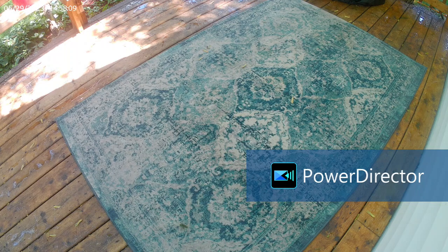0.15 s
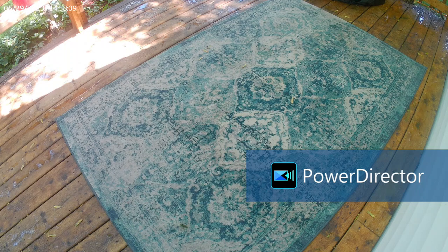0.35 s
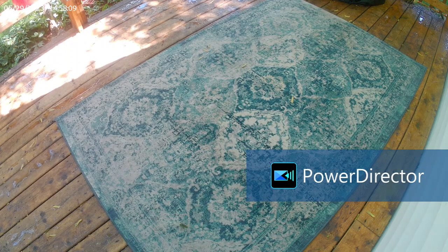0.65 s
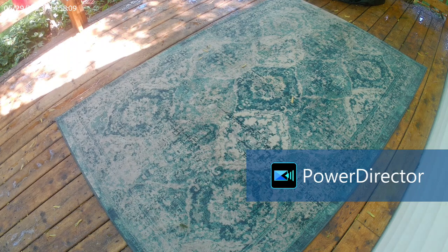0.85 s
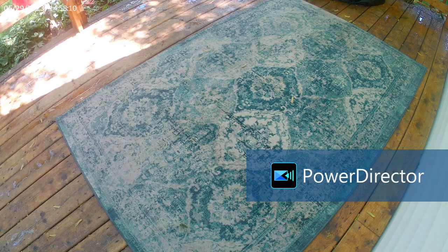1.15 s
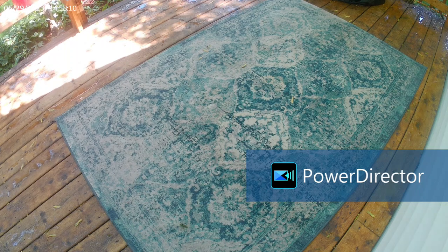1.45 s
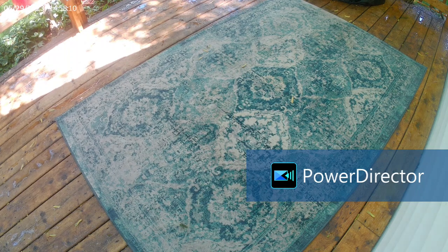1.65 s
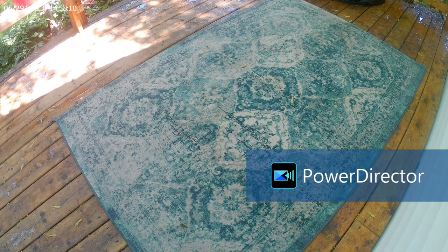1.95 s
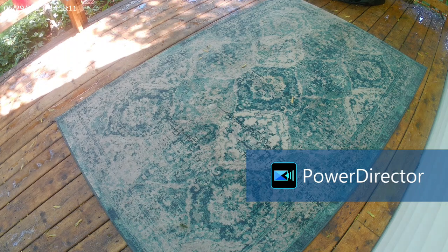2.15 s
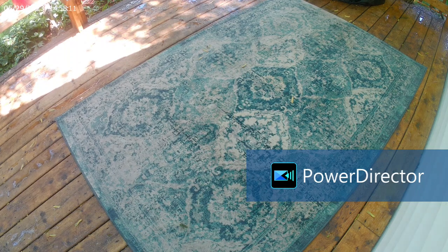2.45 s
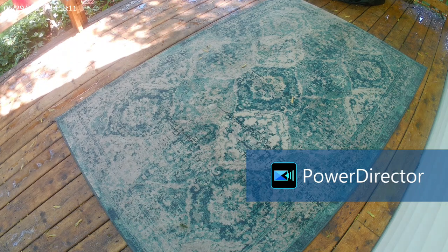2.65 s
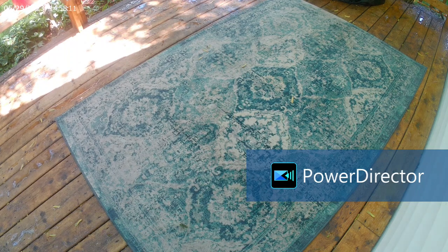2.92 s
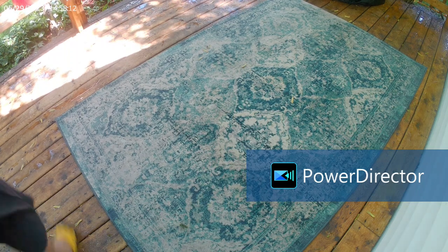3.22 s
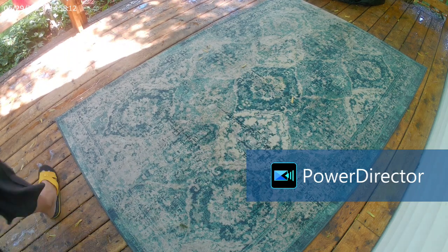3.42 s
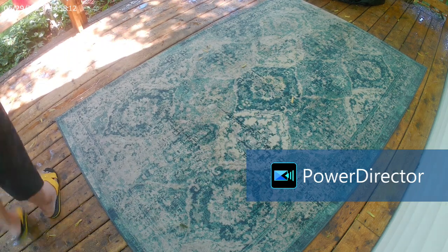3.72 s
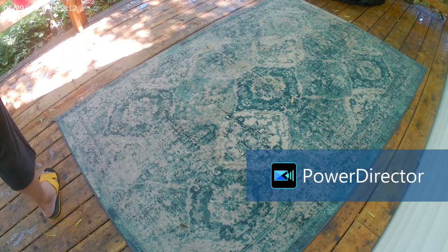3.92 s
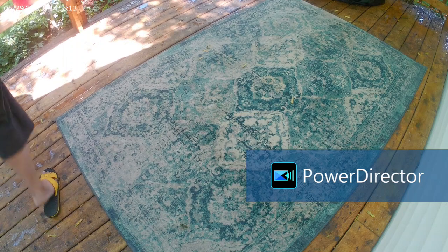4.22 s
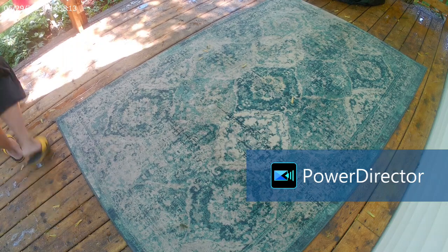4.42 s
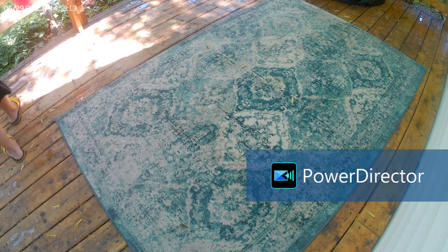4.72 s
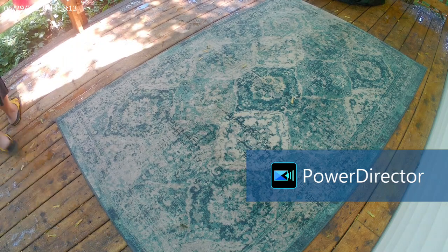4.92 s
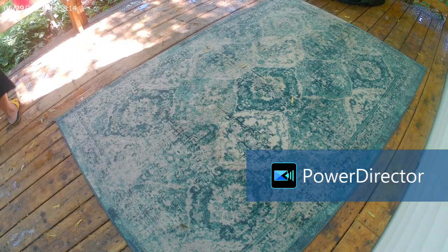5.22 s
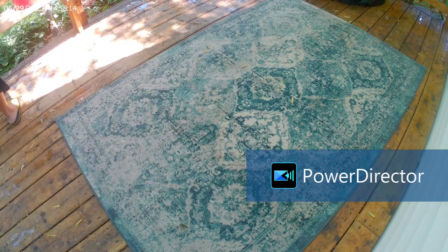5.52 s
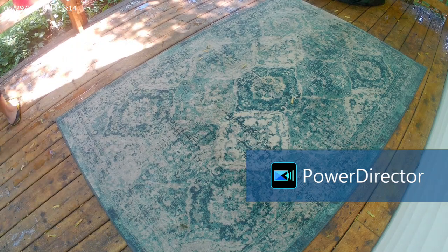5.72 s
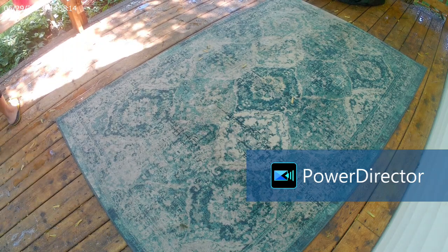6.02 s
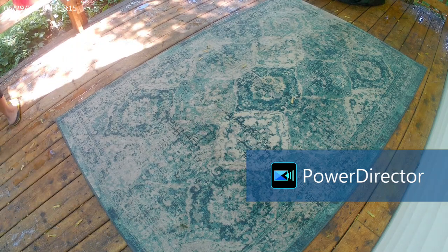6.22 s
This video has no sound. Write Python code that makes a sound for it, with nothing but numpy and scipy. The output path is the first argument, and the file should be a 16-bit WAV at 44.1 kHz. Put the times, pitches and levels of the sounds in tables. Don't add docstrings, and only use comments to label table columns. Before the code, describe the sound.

Flip-flops slap, scuff and knock irregularly across a wooden outdoor deck, one step landing very hard, over low rumble, soft hiss and timber shaking.

```python
import sys
import numpy as np
from scipy import signal
from scipy.fft import rfft, irfft
from scipy.io import wavfile
from scipy.ndimage import uniform_filter1d

SR = 44100
rng = np.random.default_rng(int(sys.argv[2]) if len(sys.argv) > 2 else 0)


def transcribe(u):
    v = np.clip(np.atleast_2d(u).T, -1, 1)
    q = np.round(v * 32767).astype(np.int16)
    wavfile.write(sys.argv[1], SR, q)


def amplitude_ratio(level_db):
    exponent = np.asarray(level_db, float) / 20
    return 10 ** exponent


N = 280652

# f/Hz, density/dB per Hz
FLOOR_SPECTRUM = [(5.9, -28), (10, 1), (32, -3), (56, 3), (79, -19.5), (171, -38), (280, -29.5),
                  (2280, -44), (14500, -50), (15900, -51)]
FLOOR_DB = -39
# f/Hz, width/Hz, level/dB
MACHINE_DRONES = [(47.26, 5.1, -43.5), (69, 9.3, -45), (132, 7.4, -59)]
# t/s, level/dB
RUSTLE_LEVEL = [(0.0, -52.5), (0.81, -53), (1.61, -49.5), (1.75, -52), (2.82, -51.5), (3.13, -55),
                (3.49, -49.5), (3.77, -56), (4.14, -52), (4.48, -55.5), (4.75, -51.5), (4.9, -53),
                (5.17, -54.5), (5.47, -53), (5.85, -54.5), (6.36, -54)]
# f/Hz, density/dB per Hz
RUSTLE_SPECTRUM = [(130, -12), (220, 4), (400, 6.5), (1000, -1.5), (3000, -10.5), (5000, -16.5),
                   (9000, -25.5)]
# peak level/dB, start f/Hz, end f/Hz, length/ms
CHIRP = (-52.5, 5749, 7900, 6.5)
CHIRP_S = 0.109
# f/Hz, t60/s
YARD_T60 = [(200, 0.19), (1000, 0.1), (4000, 0.098), (10000, 0.16)]
# f/Hz, level/dB
MIC_PORT = [(20, 12.5), (10300, -9.5), (11300, -18), (12500, -17), (16000, -33)]

# low f/Hz, high f/Hz
TIMBER_BANDS = [(12, 45), (45, 105), (105, 235)]
REST_DB = (-37, -44, -54.5)
# t/s of strongest shake, level/dB, length/s
BEAM_SHAKES = [(0.443, -27, 0.1), (0.74, -44, 0.04), (0.877, -28.5, 0.047), (1.2, -28.5, 0.13),
               (1.748, -24.5, 0.095), (2.21, -35.5, 0.081), (2.947, -33, 0.057), (3.426, -29, 0.047),
               (4.305, -38, 0.075), (4.756, -33.5, 0.093), (5.413, -27, 0.11), (5.602, -28.5, 0.058),
               (5.974, -26.5, 0.03), (6.144, -31, 0.029)]
# t/s of strongest shake, level/dB, length/s
JOIST_SHAKES = [(0.348, -43.5, 0.17), (0.715, -39, .05), (0.923, -44, 0.046), (1.163, -40, 0.11),
                (1.524, -28, 0.04), (1.793, -36, 0.031), (1.94, -35.5, .1), (2.74, -38, 0.054),
                (2.957, -37.5, 0.18), (4.213, -42, 0.1), (4.83, -38.5, 0.087), (5.425, -30, 0.22),
                (5.952, -39, 0.047), (6.162, -44, 0.038)]
# t/s of strongest shake, level/dB, length/s
PLANK_SHAKES = [(0.267, -47, 0.065), (1.11, -48, .1), (1.67, -55, 0.057), (1.921, -44, 0.068),
                (2.707, -41, 0.078), (2.93, -39, 0.051), (3.5, -55.5, 0.16), (4.258, -51, 0.037),
                (4.8, -51.5, 0.075), (5.412, -37.5, 0.11)]
RISE_SHARE = 0.4
# t/s, peak level/dB, f/Hz, t60/s, direction (down -1, up 1)
DECK_SWAYS = [
    (1.111, -13, 26, 0.23, -1),
    (1.503, -1, 30.6, 0.13, -1),
    (1.51, -9.5, 13.6, 0.58, 1),
    (3.385, -19, 35.2, 0.31, 1),
    (5.385, -17.5, 31, 0.33, 1),
]

# t/s, peak level/dB, f/Hz, t60/s
LOW_NOTES = [(0.272, -24, 117, 0.075), (1.087, -25, 166, 0.053), (1.501, -23, 135, 0.14),
             (1.913, -21.5, 181, 0.16), (2.522, -28.5, 201, 0.067), (2.721, -25.5, 116, 0.084),
             (2.949, -34, 193, 0.14), (3.597, -50, 236, 0.1), (5.392, -21.5, 150, 0.07),
             (5.381, -13.5, 121, 0.085), (5.452, -38, 100, 0.1), (5.489, -29, 100, 0.092)]
# t/s, peak level/dB, f/Hz, t60/s
MID_NOTES = [(0.588, -50, 280, 0.06), (1.083, -36, 332, 0.039), (1.475, -37, 584, 0.085),
             (1.912, -46, 264, 0.061), (1.937, -36.5, 340, 0.046), (2.522, -35, 370, 0.054),
             (2.644, -52, 431, 0.049), (2.722, -31, 388, 0.094), (2.863, -31, 370, 0.06),
             (2.888, -35, 382, 0.066), (3.266, -38, 366, 0.11), (3.599, -38, 283, 0.028),
             (3.763, -45, 460, 0.036), (4.118, -28, 460, 0.088), (4.734, -30, 630, 0.027),
             (5.142, -38, 300, 0.038), (5.374, -28, 327, 0.064), (5.453, -38, 264, 0.053),
             (5.778, -27.5, 523, 0.051)]
# t/s, peak level/dB, f/Hz, t60/s
HIGH_NOTES = [(1.936, -32, 1720, 0.034), (1.918, -39, 1150, 0.04), (2.4194, -39, 2440, 0.04),
              (2.9432, -42, 1840, 0.046), (3.5254, -43, 1700, 0.04), (3.6033, -33.5, 2280, 0.025),
              (4.2481, -37.5, 1850, 0.04), (4.8322, -41, 1620, 0.03), (5.3716, -35, 1350, 0.044),
              (5.778, -43, 1200, 0.055)]
# t/s, peak level/dB, f/Hz, t60/s
MORE_NOTES = [(1.476, -33, 720, 0.046), (1.505, -33, 1330, 0.018), (2.419, -47, 4240, 0.022),
              (2.699, -41, 476, .04), (2.916, -29, 560, 0.035), (2.917, -32, 994, 0.031),
              (2.917, -31, 4020, .015), (2.918, -32, 4970, 0.014), (2.956, -37, 2800, 0.025),
              (3.604, -33, 3120, 0.025), (3.605, -44, 3700, .02), (4.116, -36, 880, 0.045),
              (4.83, -42, 3960, .02), (5.226, -42, 800, 0.04), (5.372, -30, 660, 0.09),
              (5.631, -44, 2640, .025), (5.778, -42, 2620, 0.033), (1.508, -23, 300, 0.053),
              (5.376, -24, 229, 0.073), (5.378, -32, 399, .14), (5.441, -19.5, 92, 0.27)]
# f/Hz, level/dB, t60/s
BOARD_MODES = [(332, -26, 0.11), (462, -2.5, 0.033), (718, -4.5, 0.054), (1190, -4, 0.029),
               (1400, -6.5, 0.02), (1700, -7, 0.021), (2000, -6.5, 0.019), (2450, -31, .025)]
# t/s, level/dB, contact/ms
FLAT_BLOWS = [
    (1.1195, -31.5, 0.79),
    (1.1225, -23, 1.5),
    (1.5026, -24, 1.95),
    (1.504, -32, 0.77),
    (1.5061, -20.5, 0.59),
    (1.512, -20.5, 1.0),
]

# f/Hz, level/dB
AIR_PUFF = [(2500, -52), (5000, -31), (7500, -5.5), (10000, -2.5), (16000, -16)]
# t/s, peak level/dB, colour f/Hz, spread/octaves
TICKS = [(1.1203, -23, 2570, 1.1), (1.1234, -23.5, 1800, 1.02), (1.494, -31, 554, 0.57),
         (1.4985, -45, 2200, 0.77), (1.5017, -24, 2100, 0.69), (1.5034, -19, 2160, 1),
         (1.5057, -23, 1900, 0.93), (1.5064, -17, 1340, 0.32), (1.5136, -30, 1390, 0.57),
         (1.5170, -33, 740, 0.88), (1.9186, -34.5, 3180, 0.63), (1.9194, -34, 1200, .35),
         (1.9374, -34, 1840, 0.59), (1.9425, -40, 1200, 0.39), (2.4206, -32.5, 1890, 0.97),
         (2.4208, -46, 4300, 0.16), (2.8676, -41, 1500, 1.2), (2.8930, -39, 1100, 0.63),
         (2.8949, -35, 3000, 1), (2.9167, -23.5, 3560, 0.67), (2.9168, -38, 910, 0.68),
         (2.9203, -29, 2500, 0.63), (2.9221, -34, 800, 0.61), (2.9324, -38, 1600, 0.77),
         (2.9373, -39, 3200, 0.55), (2.9434, -38, 1000, .6), (2.9463, -36, 2000, 0.43),
         (2.9536, -44, 2800, .4), (2.9583, -35, 2800, .25), (3.5267, -39, 1100, .5),
         (3.5282, -40, 1900, 0.62), (3.6047, -36.5, 2980, 0.46), (4.1218, -38, 800, 0.45),
         (4.1301, -37, 646, 0.55), (4.2495, -32.5, 2600, 0.83), (4.7216, -44, 3500, 0.83),
         (4.7371, -38.5, 790, 0.97), (4.7437, -36, 990, 0.83), (4.7539, -41, 800, 0.57),
         (4.7628, -42, 800, 0.54), (4.8310, -44, 3800, 0.38), (4.8346, -37.5, 1700, 0.45),
         (4.8461, -46, 800, .5), (5.3740, -33.5, 890, 1.05), (5.3837, -35, 655, 0.51),
         (5.3964, -39, 600, 0.65), (5.4546, -35, 800, 0.62), (5.7793, -37.5, 594, 0.87),
         (5.7794, -43, 2400, 0.64), (5.8001, -39, 550, .4)]
# t/s, peak level/dB, length/ms, colour f/Hz, spread/octaves
SCUFFS = [(0.012, -52, 51, 3100, 0.4), (0.54, -50, 28, 1600, 0.69), (1.40, -53, 80, 2500, 0.33),
          (1.507, -41, 18, 1490, 0.48), (1.599, -48, 130, 2200, .9), (1.938, -43, 17, 1100, 0.55),
          (2.06, -50, 56, 3500, .7), (2.29, -48, 55, 2600, 1.14), (2.361, -46, 43, 2500, 0.94),
          (2.425, -44, 23, 1870, 0.45), (2.80, -48, 49, 2800, 1.1), (2.925, -41, 53, 1500, 1.2),
          (3.42, -46, 23, 3280, 0.22), (3.485, -45.5, 42, 3000, 0.67), (3.52, -40, 22, 1900, 0.73),
          (3.602, -45, 18, 2900, .35), (4.04, -55, 46, 3000, 0.38), (4.228, -38, 32, 2570, 0.71),
          (4.889, -46.5, 58, 2100, 0.91)]
# t/s, peak level/dB, length/ms, colour f/Hz, spread/octaves
SWISHES = [(1.1172, -32, 9.8, 2600, 1.1), (1.125, -35, 21, 1700, 0.83), (1.499, -26.5, 9.5, 1800, 2),
           (2.645, -43.5, 85, 8000, 0.6), (2.87, -44, 63, 2200, 1.5), (2.919, -43.5, 100, 2310, 0.95),
           (3.31, -45, 27, 3220, 0.45), (4.29, -54, 36, 9500, .2), (4.58, -50, 37, 2200, 1.2),
           (4.725, -47, 30, 3000, 1.2), (4.822, -38.5, 28, 3600, 0.75), (4.838, -44.5, 33, 3600, 1.1),
           (5.14, -51, 60, 9000, 0.6)]
# t/s, peak level/dB, length/ms, colour f/Hz, spread/octaves
GRINDS = [(.585, -45.5, 37, 720, 0.61), (2.635, -45.5, 76, 2930, 0.25), (2.63, -39.5, 70, 560, 0.59),
          (2.7, -44.5, 30, 244, 0.52), (2.705, -44, 54, 380, 0.22), (4.11, -38.5, 33, 600, 0.64),
          (5.375, -39, 100, 500, 0.94), (5.4, -37.5, 110, 332, 0.6), (5.471, -42.5, 102, 814, 0.74)]
# t/s, peak level/dB, contact/ms, colour/octaves above 1 kHz, spread/octaves
KNOCKS = [(0.591, -47, 20, -2.3, 1), (1.084, -30, 4.6, -1.3, 0.51), (1.477, -43, 9.8, 0.43, 0.68),
          (1.502, -21.5, 7.5, -0.56, 0.95), (1.915, -30.5, 17, -0.082, 0.73),
          (2.522, -33, 7.8, -2.16, 0.62), (2.863, -33, 9.6, -1.17, 1.14), (2.945, -32.5, 8.9, -1.8, 0.9),
          (3.265, -53, 9.8, -2.5, .72), (3.6, -32, 5.5, -1.8, 1.12), (3.764, -43, 8, -1.06, 0.58),
          (4.111, -33.5, 16, -0.83, 0.81), (4.735, -33, 8.8, -0.85, 0.83), (5.139, -42, 7.3, -1.9, 0.83),
          (5.224, -52, 6.1, 0.5, 0.76), (5.372, -28.5, 15, -1, 0.96), (5.450, -38, 12, -1.4, 0.98),
          (5.776, -36.5, 14, -1.28, 0.75)]
# t/s, peak level/dB, contact/ms, colour/octaves above 1 kHz, air puff level/dB
SLAPS = [(0.5497, -45.5, 3, 1.7, -14), (1.118, -26, 5.8, 1.24, -14), (1.501, -25.5, 2.7, 0.61, -5),
         (1.517, -33, 2.4, 1.3, -12), (1.916, -40, 4.9, 1, -40), (1.935, -32, 4.5, 0.54, -24),
         (2.349, -43, 5, 1.5, -16), (2.4202, -31, 1.9, 0.34, -31), (2.5716, -50, 4, 1.4, -14),
         (2.865, -38, 4, 1.05, -9), (2.8918, -37, 4, 0.52, -8), (2.9162, -31.5, 2.2, 1.95, -32),
         (3.3368, -41.5, 4.2, 1.2, -19), (3.397, -42.5, 3.9, 1.3, -14), (3.418, -42.5, 5.9, 1.2, -14),
         (3.526, -41, 4, 1.2, -10), (3.6031, -38.5, 3.2, 1.2, -4), (4.2479, -38, 4, 1.1, -26),
         (4.5667, -44, 6.6, 0.76, 2), (4.718, -44.5, 6.2, 1.5, 6), (5.63, -37, 4, 0.66, -5),
         (5.778, -40, 3.8, 0.74, -7)]
SLAP_SPREAD = 1.11
SCUFF_PUFF_DB, SWISH_PUFF_DB, GRIND_PUFF_DB, KNOCK_PUFF_DB = -17, -6, -31, -38


def evened(x):
    return x / np.sqrt(np.mean(abs(x) ** 2) + 1e-20)


def read(points, hz):
    f, value = np.transpose(points)
    return np.interp(np.log(hz + 1), np.log(f + 1), value)


def add(mix, s, sound):
    part = mix[round(s * SR):][:len(sound)]
    part += sound[:len(part)]


def coloured(gain):
    spectrum = rfft(rng.standard_normal(N))
    return evened(irfft(spectrum * gain(np.fft.rfftfreq(N, 1 / SR)), N))


def causal(gain):
    full = np.log(np.concatenate([gain, gain[-2:0:-1]]) + 1e-5)
    return np.exp(np.conj(signal.hilbert(full)))[:len(gain)]


def echoes(x, t60_of, size=16384):
    taps = np.zeros(size)
    at = np.arange(220, size - 22, 22)
    at = at + rng.integers(0, 22, len(at))
    taps[at] = rng.choice([-1., 1.], len(at))
    hz, t, z = signal.stft(taps, SR, nperseg=256)
    decay = amplitude_ratio(-60 * t / t60_of(hz)[:, None])
    tail = signal.istft(z * decay, SR, nperseg=256)[1]
    return signal.fftconvolve(x, tail / np.linalg.norm(tail))[:N]


def background():
    floor = amplitude_ratio(FLOOR_DB) * coloured(lambda hz: amplitude_ratio(read(FLOOR_SPECTRUM, hz)))
    drones = np.zeros(N)
    for f, width, db in MACHINE_DRONES:
        drones += amplitude_ratio(db) * coloured(lambda hz: 1 / (1 + (2 * (hz - f) / width) ** 2))
    flicker_db = 1.8 * coloured(lambda hz: 1 / (1 + (hz / 25) ** 2))
    level_db = np.interp(np.arange(N) / SR, *np.transpose(RUSTLE_LEVEL)) - 4
    rustle = amplitude_ratio(level_db + flicker_db) * coloured(lambda hz: amplitude_ratio(read(RUSTLE_SPECTRUM, hz)))
    return floor + drones + rustle


def bird():
    db, start_hz, end_hz, ms = CHIRP
    out, count = np.zeros(N), round(ms * SR / 1000)
    turns = np.cumsum(np.linspace(start_hz, end_hz, count)) / SR
    whistle = np.sin(2 * np.pi * turns) * signal.windows.tukey(count, 0.25)
    add(out, CHIRP_S, amplitude_ratio(db) * whistle)
    return out + amplitude_ratio(1.0) * echoes(out, lambda hz: 0.25 + 0 * hz)


def shaking(rest_db, shakes):
    t = np.arange(N) / SR
    power = amplitude_ratio(rest_db) ** 2
    for s, db, length in shakes:
        reach = length * np.where(t < s, RISE_SHARE, 1)
        power = power + amplitude_ratio(db) ** 2 * np.exp(-2 * ((t - s) / reach) ** 2)
    return np.sqrt(power)


def tremble():
    out = np.zeros(N)
    timbers = (BEAM_SHAKES, JOIST_SHAKES, PLANK_SHAKES)
    for rest_db, shakes, (lo, hi) in zip(REST_DB, timbers, TIMBER_BANDS):
        rumble = coloured(lambda hz: 1 / np.sqrt((1 + (lo / (hz + 1)) ** 8) * (1 + (hz / hi) ** 8)))
        out += shaking(rest_db, shakes) * rumble
    return out


def sways():
    out, t = np.zeros(N), np.arange(SR // 2) / SR
    onset = 1 - np.exp(-t / 0.012)
    for s, db, hz, t60, way in DECK_SWAYS:
        swing = amplitude_ratio(db - 60 * t / t60) * np.sin(2 * np.pi * hz * t)
        add(out, s, np.sign(way) * swing * onset)
    return out


def ring(hz, t60, rise_cycles, detune):
    t = np.arange(SR // 4) / SR
    pair = np.sin(2 * np.pi * hz * t) + 0.53 * np.sin(2 * np.pi * hz * detune * t)
    return pair * amplitude_ratio(-60 * t / t60) * (1 - np.exp(-t * hz / rise_cycles))


def planks():
    out, notes = np.zeros(N), LOW_NOTES + MID_NOTES + HIGH_NOTES + MORE_NOTES
    sides = np.sign(rng.standard_normal(len(notes)))
    for (s, db, hz, t60), side in zip(notes, sides):
        note = ring(hz, t60, rise_cycles=0.44, detune=1 + 0.078 * side)
        add(out, s, amplitude_ratio(db - 5) * note / abs(note).max())
    boards = sum(amplitude_ratio(db) * ring(hz, t60, rise_cycles=0.33, detune=1.042) for hz, db, t60 in BOARD_MODES)
    for s, db, ms in FLAT_BLOWS:
        push = np.hanning(max(round(ms * SR / 2000), 3))
        add(out, s, amplitude_ratio(db) * np.convolve(boards, push / push.sum()))
    return out


def ticks(size=2048):
    out, hz = np.zeros(N), np.fft.rfftfreq(size, 1 / SR)
    for s, db, colour_hz, spread in TICKS:
        sole = np.exp(-0.5 * (np.log2(hz / colour_hz + 1e-3) / max(spread, 0.1)) ** 2)
        sound = irfft(causal(sole * amplitude_ratio(read(MIC_PORT, hz))))[:size // 2]
        add(out, s - abs(sound).argmax() / SR, amplitude_ratio(db) * sound / abs(sound).max())
    return out


def struck(t, length):
    return (1 - np.exp(-t / (0.14 * length))) * np.exp(-(t / length) ** 1.15)


def dragged(t, length):
    return np.sin(np.pi * np.minimum(t / length, 1) ** 0.7) ** 0.9


def contacts(table, shape, grain_db, size):
    out, t, hz = np.zeros(N), np.arange(size) / SR, np.fft.rfftfreq(size, 1 / SR)
    port = amplitude_ratio(read(MIC_PORT, hz))
    for s, db, ms, colour, spread, puff_db in table:
        noise, grit = rng.standard_normal((2, size))
        grit = amplitude_ratio(grain_db * evened(uniform_filter1d(grit, size=40)))
        force = rfft(noise * grit * shape(t, max(ms, 0.5) / 1000))
        force /= np.sqrt(uniform_filter1d(abs(force) ** 2, size=size // 64))
        sole = np.exp(-0.5 * ((np.log2(hz / 1000 + 1e-3) - colour) / max(spread, 0.2)) ** 2)
        air = amplitude_ratio(puff_db + read(AIR_PUFF, hz))
        sound = irfft(force * causal((sole + air) * port))
        add(out, s, amplitude_ratio(db) * sound[:size // 2] / abs(sound).max())
    return out


def drags(table, puff_db):
    rows = [(s, db, ms, np.log2(hz / 1000), spread, puff_db) for s, db, ms, hz, spread in table]
    return contacts(rows, dragged, grain_db=3.5, size=16384)


def knocks():
    rows = [(*row, KNOCK_PUFF_DB) for row in KNOCKS]
    return contacts(rows, struck, grain_db=3.5, size=8192)


def slaps():
    rows = [(s, db, ms, colour, SLAP_SPREAD, puff_db) for s, db, ms, colour, puff_db in SLAPS]
    return contacts(rows, struck, grain_db=1.0, size=8192)


def scene():
    far = background() + bird() + tremble() + sways()
    steps = planks() + ticks() + knocks() + slaps()
    steps += drags(SCUFFS, SCUFF_PUFF_DB) + drags(SWISHES, SWISH_PUFF_DB) + drags(GRINDS, GRIND_PUFF_DB)
    steps += amplitude_ratio(-6.0) * echoes(steps, lambda hz: read(YARD_T60, hz))
    return (steps + far)[None]


def roll_off(x):
    return signal.sosfilt(signal.butter(12, 16060, fs=SR, output="sos"), x)


def record(dry):
    edge = signal.firwin(1023, 15790, window=("kaiser", 9), fs=SR)
    padded = np.pad(dry, ((0, 0), (511, 511)), "reflect", reflect_type="odd")
    mix = signal.oaconvolve(padded, edge[None], "valid")
    return roll_off(mix)


dry = scene()
out = record(dry)
transcribe(out)
```